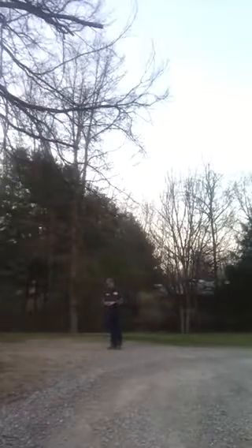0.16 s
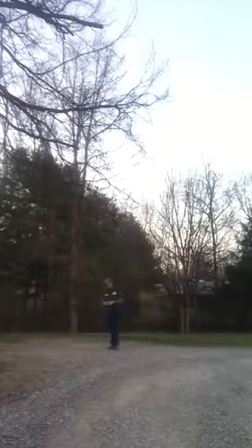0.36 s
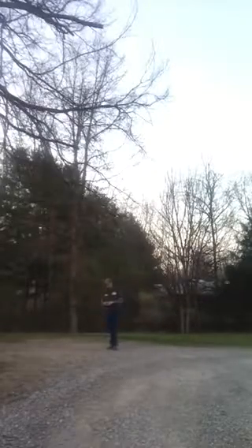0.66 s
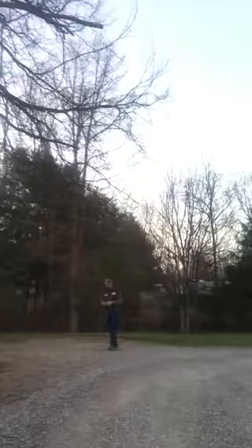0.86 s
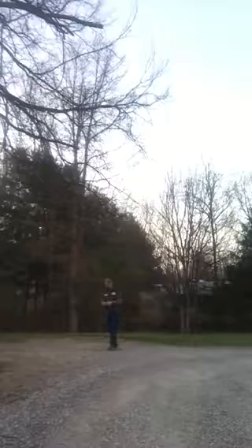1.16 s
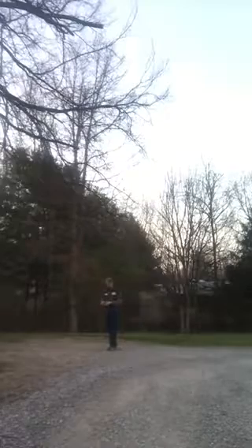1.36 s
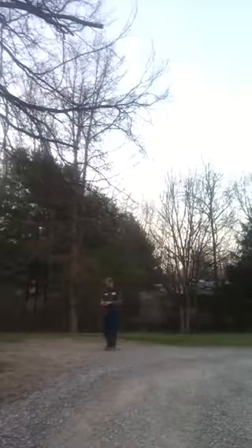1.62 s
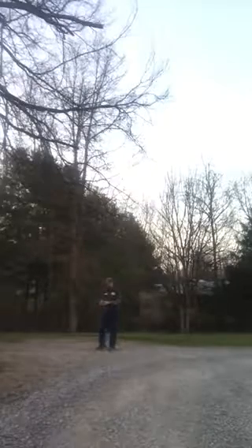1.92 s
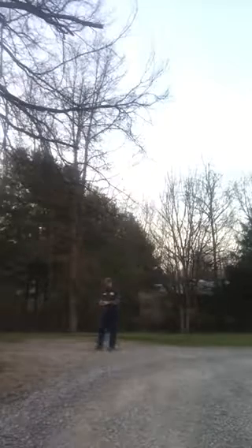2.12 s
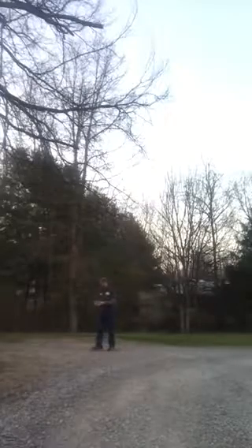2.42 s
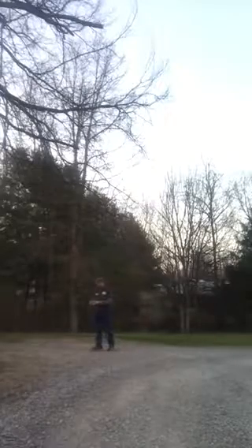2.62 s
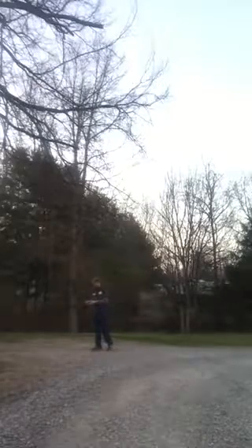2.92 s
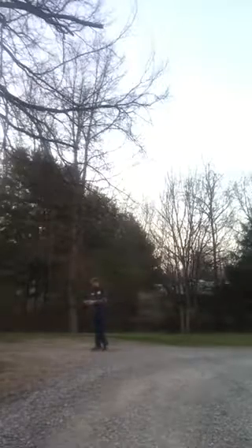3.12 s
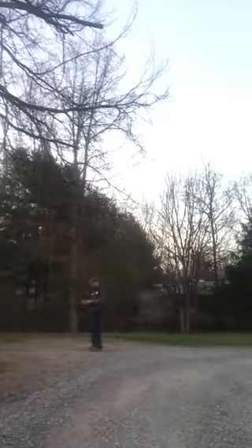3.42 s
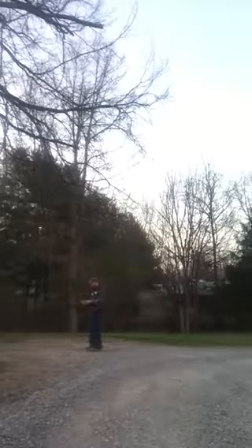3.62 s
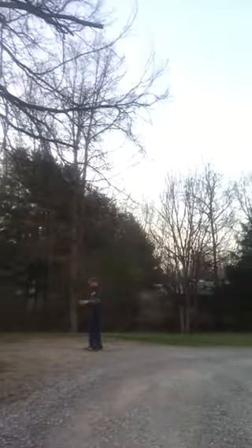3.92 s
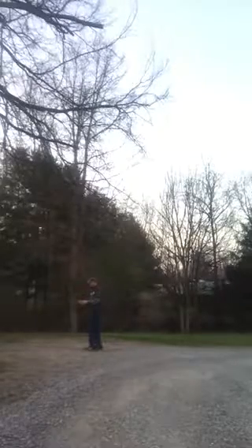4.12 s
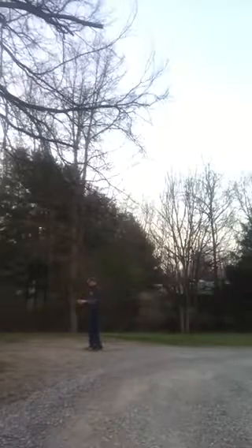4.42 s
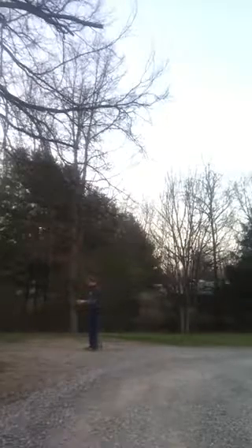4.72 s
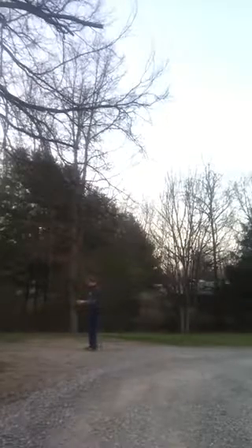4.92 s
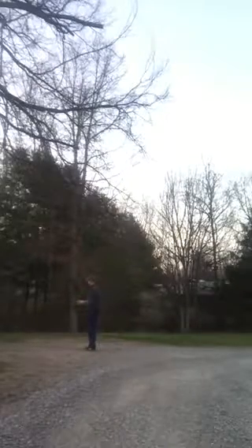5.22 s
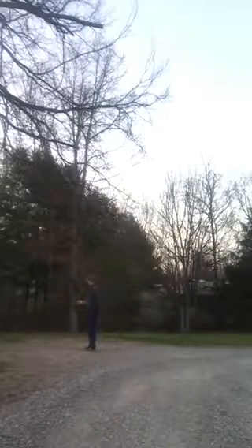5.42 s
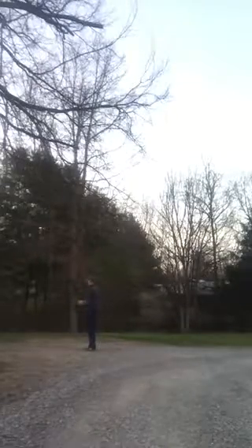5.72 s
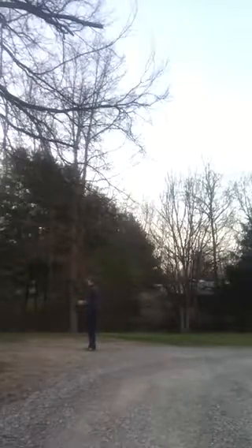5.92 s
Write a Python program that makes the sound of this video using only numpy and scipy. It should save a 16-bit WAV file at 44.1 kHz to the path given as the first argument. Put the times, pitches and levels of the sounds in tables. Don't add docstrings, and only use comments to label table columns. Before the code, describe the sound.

Outdoors at a distance, brisk two-note turkey-like yelps from a friction call, ending in clucks, with faint gravel shifts and low traffic rumble.

```python
import sys
import numpy as np
from scipy import signal
from scipy.fft import rfft, irfft
from scipy.io import wavfile
from scipy.ndimage import uniform_filter1d

SR = 44100
rng = np.random.default_rng(int(sys.argv[2]) if len(sys.argv) > 2 else 0)


def transcribe(u):
    v = np.clip(np.atleast_2d(u).T, -1, 1)
    q = np.round(v * 32767).astype(np.int16)
    wavfile.write(sys.argv[1], SR, q)


def magnitude_from_level(level_db):
    exponent = np.asarray(level_db, float) / 20
    return 10 ** exponent


N = 267246
BREAK_HZ = 900


def colour(x, points):
    hz, db = np.transpose(points)
    f = np.maximum(np.fft.rfftfreq(len(x), 1 / SR), 1)
    return irfft(rfft(x) * magnitude_from_level(np.interp(np.log(f), np.log(hz), db)), len(x))


def unit(x):
    return x / np.sqrt(np.mean(x ** 2))


def walk(rate_hz):
    k = int(SR / rate_hz)
    held = np.repeat(rng.standard_normal(N // k + 1), k)
    return unit(uniform_filter1d(uniform_filter1d(held, k), k)[:N])


def tone(hz, waver):
    cycles = np.cumsum(hz * (1 + waver * walk(2.933))) / SR
    return np.sqrt(2) * np.sin(2 * np.pi * (cycles + rng.random()))


# start_s, drone_db, low_drone_db
ENGINES = [(0, -42.5, -65), (.4, -46, -77), (1.05, -41.5, -59), (1.72, -44.5, -54), (2, -52, -61),
           (2.4, -52, -53), (2.751, -49.5, -52.5), (3.7, -54.5, -64.5), (4.199, -54.5, -54),
           (4.75, -50, -59), (5.15, -54.5, -57), (5.7, -55.5, -57), (5.96, -48, -54.5)]
# pitch_hz, level_db (re drone)
ENGINE_ORDERS = [(132, -11), (219.8, -16), (257, -16), (276, -16), (331, -17), (385, -18), (421.5, -15),
                 (458, -15), (494, -16)]
# pitch_hz, level_db (per Hz)
RUMBLE_COLOUR = [(24, -37.5), (40, -1), (97, -2.5), (133, -6.5), (200, -11), (259, -12), (505, -10.5),
                 (569, -8.5), (736, -11), (920, -9.5), (1340, -23.5), (1700, -30.5), (1890, -28.5),
                 (2400, -58.5), (3120, -76), (5280, -120)]
# pitch_hz, level_db (per Hz)
HISS_COLOUR = [(1470, -51.5), (2500, 9), (2800, -5.5), (3190, 4), (4170, 1), (7070, -1), (15500, -5)]


def distance():
    start_s, *columns = np.transpose(ENGINES)
    t = np.arange(N) / SR
    drone_db, low_db = (np.interp(t, start_s, c) for c in columns)
    orders = sum(magnitude_from_level(db + 2 * walk(1.5)) * tone(hz, 0.002) for hz, db in ENGINE_ORDERS)
    drone = magnitude_from_level(drone_db) * (tone(109.6, 0.00469) + orders)
    low_drone = magnitude_from_level(low_db + 5.0) * tone(80.5, 0.0143)
    rumble_db = -47 - 0.7 * t + 6 * np.maximum(t - 5.4, 0)
    swell_db = 1.0 * walk(5.45)
    rumble = magnitude_from_level(rumble_db + 2.0 + swell_db) * unit(colour(rng.standard_normal(N), RUMBLE_COLOUR))
    hiss = magnitude_from_level(-75.5) * unit(colour(rng.standard_normal(N), HISS_COLOUR))
    return drone + low_drone + rumble + hiss


# start_s, period_s, count
CLOCKS = [
    (.0854, .1024, 59),
    (.0591, .30003, 10),
    (3.0542, .3001, 6),
    (4.858, .3, 4),
]


def ticks():
    clock_db, scatter_db = (-67, -65.5, -64, -71), 3.5
    ring_hz, ring_s = 9900, 0.00012
    x, t = np.zeros(N + SR), np.arange(100) / SR
    for (start_s, period_s, count), db in zip(CLOCKS, clock_db):
        at = ((start_s + period_s * np.arange(count)) * SR).astype(int)
        x[at] += magnitude_from_level(db + scatter_db * rng.standard_normal(count))
    ring = np.sin(2 * np.pi * ring_hz * t) * t / ring_s * np.exp(1 - t / ring_s)
    return np.convolve(x, ring)[:N]


# start_s, peak_db, pitch_hz, width_hz
STONES = [
    (.81, -58, 2400, 696),
    (.822, -53, 2300, 710),
    (.831, -54, 2500, 700),
    (.84, -49.5, 2400, 600),
    (.849, -53, 2600, 600),
    (.862, -52, 2600, 700),
    (2.3154, -61, 4200, 2480),
    (2.328, -54, 2600, 900),
    (2.508, -47.5, 3800, 3500),
]


def gravel():
    length_s = 0.0053
    x, t = np.zeros(N + SR), np.arange(500) / SR
    noises = rng.standard_normal((len(STONES), len(t)))
    for (start_s, db, hz, width_hz), noise in zip(STONES, noises):
        burst = signal.lfilter(*signal.iirpeak(hz, hz / width_hz, SR), noise * np.exp(-t / length_s))
        start = int(start_s * SR)
        x[start:start + len(t)] += magnitude_from_level(db) * burst / np.abs(burst).max()
    return colour(x[:N], [(1200, 1), (2500, 8.5), (3300, -3), (5200, 4), (6200, -32)])


# pitch_hz, level_db
TREE_COLOUR = [(900, 0), (1400, -13), (1750, 6.5), (2050, -3.5), (2700, -10.5), (3600, -10), (5300, -14.5),
               (9000, -9.5)]


def trees(x):
    echo_db, t60_s, delay_s, patchy_db = -2, 0.19, 0.0061, -0.5
    wood_db, wood_t60_s = -18.5, 0.86
    t = np.arange(SR) / SR
    response = rng.standard_normal(SR) * magnitude_from_level(patchy_db * walk(75.5)[:SR])
    response *= magnitude_from_level(-60 * t / t60_s) + magnitude_from_level(wood_db - 60 * t / wood_t60_s)
    response *= np.clip(t / delay_s - 1, 0, 1)
    response /= np.sqrt(np.sum(response ** 2))
    return magnitude_from_level(echo_db) * signal.fftconvolve(colour(x, TREE_COLOUR), response)[:N]


# pitch_hz, width_hz, level_db
POT_MODES = [(1213, 255, -5), (1353, 500, 0), (1640, 73, -9), (1897, 315, 0.5), (2710, 520, -13),
             (3112, 220, -16), (3380, 535, -16.5), (3865, 790, -20.5), (5280, 520, -19), (5660, 390, -24.5),
             (6920, 1400, -43.5), (8650, 600, -34.5), (9650, 1000, -48)]
# pitch_hz, width_hz, depth (0-1)
MODE_GAPS = [(5130, 110, 0.9), (6630, 430, 0.8), (7550, 860, 0.3)]


def pot_answer(hz, low_db=0, main_db=0, upper_db=0, treble_db=0, mids_db=0, top_db=0, gap_share=1):
    def beam_db(f):
        if f < 1270:
            return low_db
        if 1800 < f < 2200:
            return main_db
        if 2600 < f < 2900:
            return upper_db
        if f > 8000:
            return treble_db + top_db
        if f > 4600:
            return treble_db
        return mids_db if f > 3000 else 0

    modes = 0
    for f, width_hz, db in POT_MODES:
        damping = 1j * hz * width_hz
        modes = modes + magnitude_from_level(db + beam_db(f)) * (damping / (f ** 2 - hz ** 2 + damping)) ** 3
    for gap_hz, width_hz, depth in MODE_GAPS:
        modes = modes * (1 - gap_share * min(depth, 1) * np.exp(-((hz - gap_hz) / width_hz) ** 2))
    return modes / (1 + (1000 / np.maximum(hz, 1)) ** 16)


# start_s, raggedness (0-1)
RAGGEDNESS = [(0, 0.34), (1.1, 0.39), (1.7, 0.67), (3.5, 0.45), (4.5, 0.71), (5.1, 0.34), (6.06, 0.41)]


def stroke(table, beams):
    s, slip_hz, slip_db = np.transpose(table)
    t = np.arange(s[0], s[-1], 1 / SR)
    db = np.interp(t, s, slip_db)
    clear = slip_hz > BREAK_HZ
    hz = np.interp(t, s[~clear], slip_hz[~clear])
    if clear.any():
        hz = np.where(t < s[~clear][0], np.interp(t, s[clear], slip_hz[clear]), hz)
    ragged = np.where(hz > BREAK_HZ, 0.06, np.interp(s[0], *np.transpose(RAGGEDNESS)))
    chance = rng.standard_normal((300, 2))
    noise = rng.standard_normal(SR // 4)[:len(t)]
    even_slip = (np.cumsum(hz) / SR).astype(int)
    phase = np.cumsum(hz * (1 + 0.091 * ragged * chance[even_slip, 0])) / SR
    slip = phase.astype(int)
    multiples = np.arange(1, 15)[:, None]
    soft_db = 0.04 * np.maximum(hz - 1020, 0) + 0.2 * np.maximum(-33 - db, 0)
    soft_db += 0.86 * (hz > BREAK_HZ)
    weights = magnitude_from_level(-soft_db * (multiples - 1.5))
    pulses = np.sum(weights * np.cos(2 * np.pi * multiples * (phase - 0.5)), axis=0)
    size = magnitude_from_level(ragged * (5 * chance[slip, 1] + 4 * (-1) ** slip))
    grit = 3.2 * ragged * noise * magnitude_from_level(-2 * soft_db)
    answer = weights * pot_answer(multiples * hz, *beams)
    loud = np.sqrt(np.sum(np.abs(answer) ** 2, axis=0) / 2)
    force = magnitude_from_level(db - 3 * ragged) / uniform_filter1d(loud, size=100)
    return force * (size * pulses + grit) * signal.windows.tukey(len(t), 0.06)


def yelp(break_s, front_s, rasp_s, front_db, rasp_hz):
    touch_hz, bite_hz, bite_share = 1119, 979, 0.82
    touch_db = -49.5 + 1.73 * break_s
    jump_s, dip_db = 0.0031, -3
    slowest_share, rise_hz = 0.2, 74.4
    u = np.linspace(0, 1, num=12)
    bite = 0.5 - 0.5 * np.cos(np.pi * np.minimum(u / bite_share, 1))
    front = [break_s - front_s + u * (front_s - jump_s),
             touch_hz + bite ** 1.5 * (bite_hz - touch_hz),
             touch_db + bite * (front_db - touch_db) + dip_db / 2 * (u == 1)]
    power = max(0.95 + 0.2 * (-27 - front_db), 0.5)
    rise = ((u - slowest_share) / (1 - slowest_share)) ** 2
    rasp = [break_s + u * rasp_s,
            rasp_hz + rise_hz * rise,
            -29 - 11 * u ** power + dip_db * (u == 0)]
    lift = np.array(rasp)[:, -1:] + [[0.01], [30], [-10.5]]
    return np.hstack([front, rasp, lift]).T


def cluck(start_s, peak_db, low_hz, slowest_s):
    length_s, from_hz, end_hz, dip_s = 0.0289, 729.8, 825, 0.00457
    peak_s, round_db = 0.011, -7
    jab_s, jab_db = 0.0035, -10
    t = np.linspace(0, length_s, num=28)
    line_hz = from_hz + (end_hz - from_hz) * t / length_s
    hz = line_hz + (low_hz - line_hz) * np.exp(-((t - slowest_s) / dip_s) ** 2)
    db = peak_db + round_db * ((t - peak_s) / peak_s) ** 2 * np.where(t < peak_s, 0.5, 1)
    db = db + jab_db * np.maximum(1 - t / jab_s, 0)
    return np.transpose([start_s + t, hz, db])


# break_s, front_s (length), rasp_s (length), front_peak_db, lowest_rasp_hz
YELP_STROKES = [(0.054, 0.046, 0.04, -25.5, 720), (0.385, 0.038, 0.049, -27.5, 687),
                (0.721, 0.037, 0.035, -28, 708), (1.058, 0.041, 0.042, -28, 689),
                (1.384, 0.052, 0.034, -29.5, 698.4), (1.709, 0.061, 0.064, -31, 662),
                (2.036, 0.045, 0.064, -34.5, 658.4), (2.372, 0.036, 0.063, -36, 679.5),
                (2.729, 0.046, .052, -33, 691), (3.077, .051, 0.046, -29.5, 704.6),
                (3.433, 0.066, 0.045, -30.5, 699.5), (3.789, 0.043, 0.061, -31.5, 662),
                (4.161, .036, 0.059, -38.5, 665), (4.52, .038, .064, -43.5, 668.4)]
# start_s, peak_db, slowest_slip_hz, slowest_s (after touch)
CLUCK_STROKES = [
    (5.1055, -27.5, 628, 0.01005),
    (5.3016, -25.5, 623, .012),
    (5.4968, -25.5, 641, .012),
    (5.7537, -26, 618, .010),
    (6.0216, -28, 621, .013),
]
# turned_deg, low_db, main_db, upper_db, treble_db
BEAMS = [(0, -10.5, 5.5, 6.5, 4.5), (44.5, 0.5, -7, 2, 4.5), (72, 4, -2, -3, -0.5),
         (87, -5.5, -6, -8.5, -7), (100, 13.5, -18.5, 1, -4.5)]


def call():
    turn_deg_per_s, ring_up_s, size = 20, 0.003, 8192
    near, around = np.zeros(N + SR), np.zeros(N + SR)
    turned_deg, *columns = np.transpose(BEAMS)
    hz = np.fft.rfftfreq(size, 1 / SR)
    for table in [yelp(*row) for row in YELP_STROKES] + [cluck(*row) for row in CLUCK_STROKES]:
        start_s, first_hz, _ = table[0]
        facing_deg = turn_deg_per_s * start_s
        beams = [np.interp(facing_deg, turned_deg, c) for c in columns]
        jab = first_hz < BREAK_HZ
        beams += [-6.5 * jab, -9.5 * jab]
        beams.append(np.interp(facing_deg, (70, 85), (1, 0.16)))
        force = rfft(stroke(table, beams), size)
        start = int((start_s - ring_up_s) * SR)
        near[start:start + size] += irfft(force * pot_answer(hz, *beams))
        around[start:start + size] += irfft(force * pot_answer(hz, *(0.11 * np.array(beams))))
    return near[:N], around[:N]


def scene():
    near, around = call()
    background = distance() + magnitude_from_level(4.5) * ticks() + gravel()
    return (background + trees(around) + magnitude_from_level(-0.27) * near)[None]


def roll_off(x):
    return signal.sosfilt(signal.butter(12, 15690, fs=SR, output="sos"), x)


def record(dry):
    thin = signal.sosfilt(signal.butter(3, 46, "high", fs=SR, output="sos"), dry)
    return roll_off(thin)


dry = scene()
out = record(dry)
transcribe(out)
```